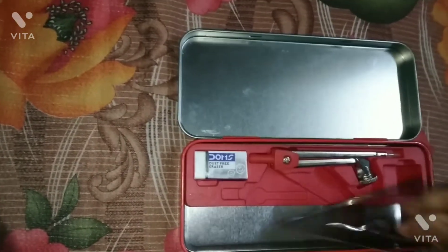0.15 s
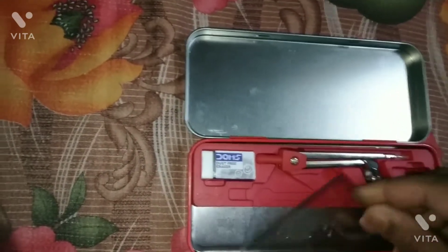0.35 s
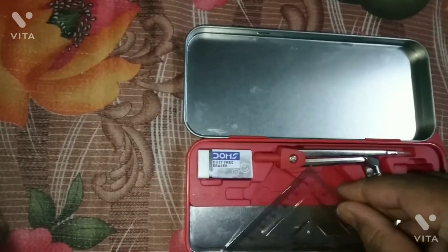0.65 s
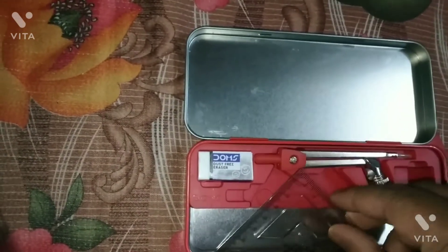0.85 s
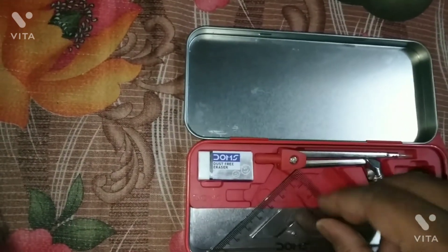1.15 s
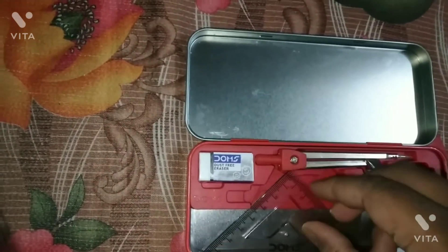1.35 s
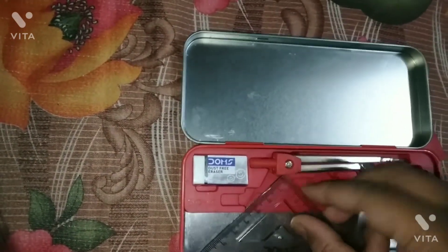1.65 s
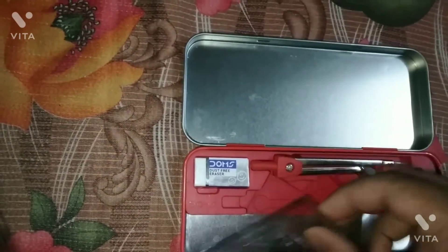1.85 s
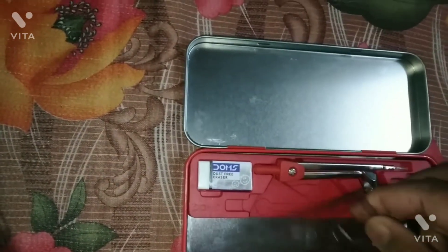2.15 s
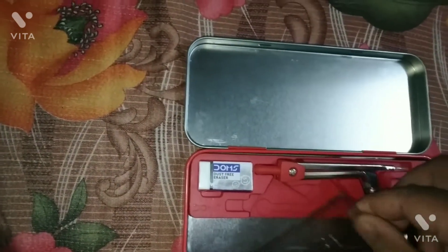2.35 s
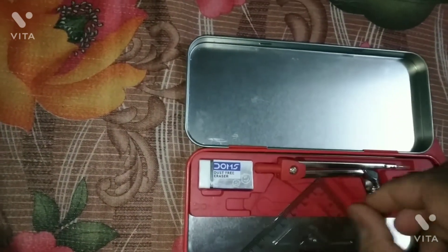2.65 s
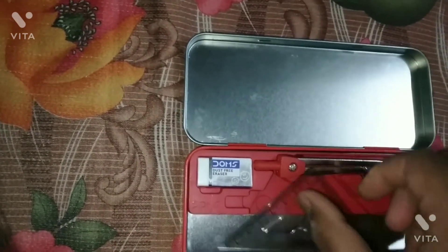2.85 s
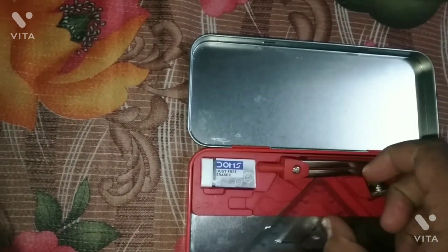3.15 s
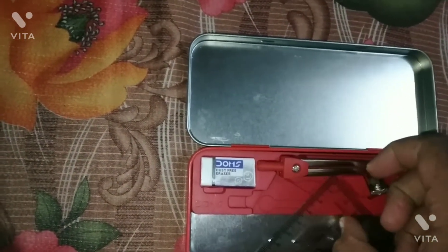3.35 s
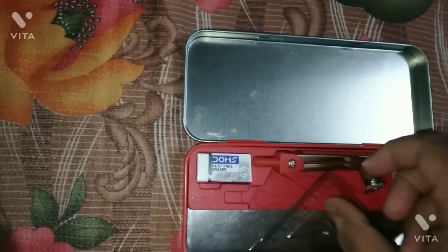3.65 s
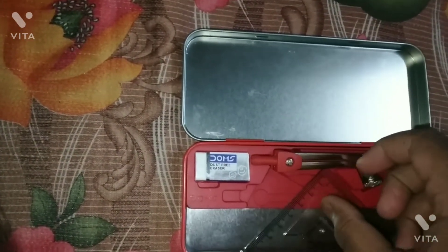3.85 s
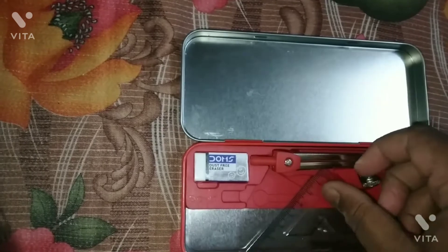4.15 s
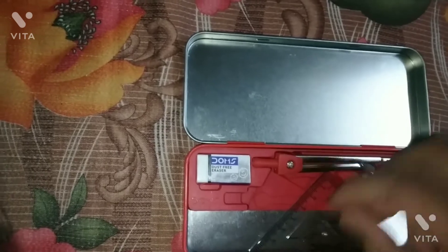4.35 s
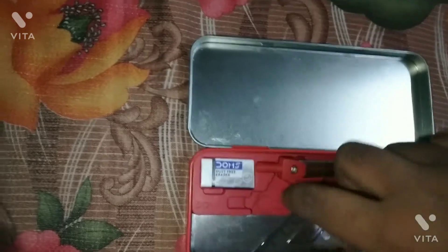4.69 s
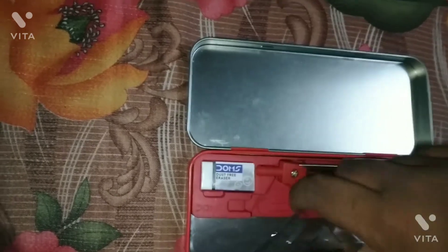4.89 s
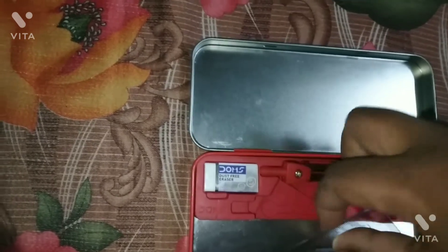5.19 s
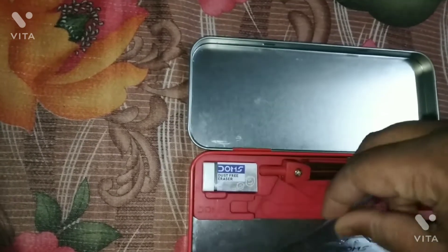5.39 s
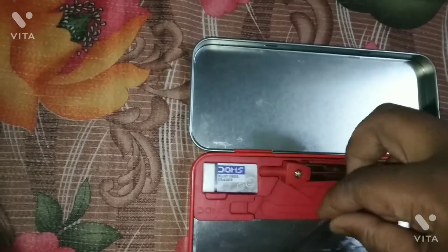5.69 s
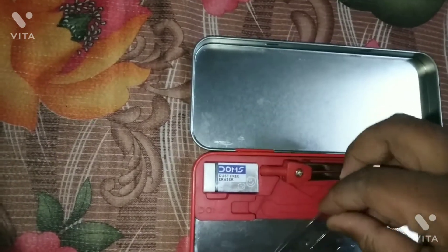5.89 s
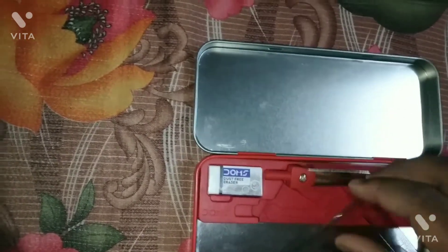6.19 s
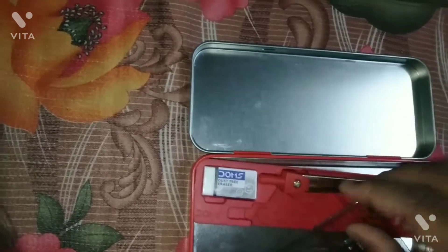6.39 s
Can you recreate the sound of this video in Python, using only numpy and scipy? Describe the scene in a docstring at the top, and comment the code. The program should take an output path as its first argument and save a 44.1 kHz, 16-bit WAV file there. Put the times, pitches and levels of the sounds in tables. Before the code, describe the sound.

A hand fits a plastic set square and a steel compass into the plastic tray of an open tin case, close to a phone microphone. The pieces tap, bounce, rub and drag in irregular bursts, with a very brief ring from the tray and tin and an occasional rattle. Behind them a small room carries a low motor hum, rumble and hiss. A soft drone swells midway, then a faint whine enters.

```python
"""A small room with a low motor hum, rumble and hiss. From 0.3 s a hand fits a plastic set square and a
steel compass into the plastic tray of an open tin case, close to a phone. The pieces rub, tap, bounce
and drag; tray and tin ring briefly. From 1.8 s a loose piece rattles now and then. A low drone swells
near 3 s; a faint whine enters near 4 s. Throughout, the phone's noise gate cuts treble in the pauses."""
import sys
import numpy as np
from scipy import signal
from scipy.fft import rfft, irfft, next_fast_len
from scipy.io import wavfile
from scipy.ndimage import uniform_filter1d, map_coordinates

SR = 44100
rng = np.random.default_rng(int(sys.argv[2]) if len(sys.argv) > 2 else 0)


def digitize_waveform(pressure):
    """Quantize a signal to 16-bit integers and store it at the path in sys.argv[1].

    Rows of a 2-D input are taken as channels; values are limited to [-1, 1].
    """
    field = np.atleast_2d(pressure).T
    bounded = np.clip(field, -1, 1)
    quanta = np.round(bounded * 32767).astype(np.int16)
    wavfile.write(sys.argv[1], SR, quanta)


N = 287973

# spectrum of a contact on the tray: f/Hz, density/dB
TRAY_SPECTRUM = [(130, -13.5), (195, 9.5), (280, 3), (420, -4), (560, -6), (800, -5), (1200, -7.5),
                 (1600, -0.5), (2800, 8.5), (4800, -0.5), (6600, 7), (7500, 5.5), (8500, -6.5),
                 (15800, -21.5)]
# stereo width: f/Hz, side minus mid/dB
STEREO_WIDTH = [(25, -6), (70, -14), (400, -13), (800, -7), (1500, -3), (4500, -1.5), (7000, -4.5),
                (11000, -7), (16000, -6)]


def amp(db):
    return 10 ** (np.asarray(db) / 20)


def unit(x):
    return x / np.sqrt(np.mean(x ** 2) + 1e-20)


def along(points, hz):
    """Interpolate (f/Hz, value) points on a log axis."""
    f, v = np.transpose(points)
    return np.interp(np.log(hz + 1), np.log(f + 1), v)


def curve(points):
    """Interpolate (t/s, value) points per sample."""
    return np.interp(np.arange(N) / SR, *np.transpose(points))


def wobble(rate_hz):
    """Smooth random curve through knots at rate_hz."""
    knots = rng.standard_normal(int(N * rate_hz / SR) + 4)
    return map_coordinates(knots, [np.arange(N) * rate_hz / SR])


def filtered(x, response):
    m = next_fast_len(N + 8192)
    return irfft(rfft(x, m) * response(np.fft.rfftfreq(m, 1 / SR)), m)[..., :N]


def stereo(pair, colour=lambda hz: 1):
    """Mid and side to left and right, nearly mono in the low mids."""
    mid, side = filtered(pair, lambda hz: colour(hz) * amp(along(STEREO_WIDTH, hz) * [[0], [1]]))
    return np.array([mid + side, mid - side])


def noise(colour, source=None):
    """Stereo noise of rms 1, shaped by the gain colour(hz)."""
    return unit(stereo(rng.standard_normal((2, N)) if source is None else source, colour))


def shifting_noise(depth_db):
    """Two noises whose resonant peaks shift as fingers and edges move."""
    spectra = signal.stft(rng.standard_normal((2, N)), nperseg=256)[2]
    peaks = uniform_filter1d(rng.standard_normal(spectra.shape[1:]), size=3, axis=0)
    peaks = uniform_filter1d(peaks, size=24, axis=1)
    return signal.istft(spectra * amp(depth_db * unit(peaks)), nperseg=256)[1][:, :N]


def add(track, at_s, sound):
    part = track[:, max(round(at_s * SR), 0):][:, :sound.shape[1]]
    part += sound[:, :part.shape[1]]


def motor_hum(hum_hz=96, waver_db=3, octave_db=-11):
    """A motor's fundamental and octave, wavering in pitch and level."""
    # hum envelope: t/s, level/dB
    levels = [(0, -53), (2.6, -53), (3.9, -61), (5.05, -52), (5.5, -59), (5.68, -45.5), (5.86, -53),
              (6.53, -53.5)]
    phase = 2 * np.pi * np.cumsum(hum_hz * (1 + .05 * wobble(16))) / SR
    tone = unit(np.sin(phase) + amp(octave_db) * np.sin(2 * phase))
    return amp(curve(levels) + waver_db * wobble(22)) * tone


def room_noise(rumble_db=-53, hiss_db=-78):
    """Steady room rumble and hiss."""
    # rumble spectrum: f/Hz, density/dB
    rumble_spectrum = [(12, -39.5), (20, -12), (38, -9), (54, -7.5), (102, -10.5), (149, -7.5), (169, -35),
                       (195, -17), (221, -24), (715, -36.5), (769, -41), (1030, -43.5), (1500, -80.5),
                       (1950, -101), (3300, -120)]
    # hiss spectrum: f/Hz, density/dB
    hiss_spectrum = [(300, -8.5), (1200, 0.5), (3000, 4), (7000, -0.5), (9500, -4.5), (16000, -19)]
    rumble = amp(rumble_db) * noise(lambda hz: amp(along(rumble_spectrum, hz)))
    hiss = amp(hiss_db) * noise(lambda hz: amp(along(hiss_spectrum, hz)))
    return rumble + hiss


def drone(centre_hz=295, half_width_hz=45, gain_db=1):
    """A soft, low band of noise that swells and sinks."""
    # drone envelope: t/s, relative level/dB
    levels = [(0.0, -74.5), (2.78, -69), (3.05, -55), (3.84, -63), (5.09, -59), (5.31, -74), (6.53, -61.5)]
    band = noise(lambda hz: 1 / (1 + ((hz - centre_hz) / half_width_hz) ** 2))
    return amp(curve(levels) + gain_db) * band


def rubs(fall_over_rise=1.5):
    """Short strokes of an edge: gains of the scrape and of the tray's rumble."""
    # strokes: peak t/s, level/dB, width/s, relative tray rumble/dB
    strokes = [(0.299, -61.5, 0.12, -23), (0.553, -62, 0.012, -1), (.69, -58, 0.014, -16),
               (0.812, -48.5, 0.013, 6.5), (0.947, -47, 0.032, -6.5), (1.288, -46, .017, 4.5),
               (1.493, -58, 0.018, 3.5), (1.69, -50.5, 0.039, 2), (1.783, -31.5, 0.016, 1.5),
               (1.923, -36.5, 0.026, -12.5), (2.074, -55, 0.015, 9), (2.214, -44, 0.027, -32),
               (2.336, -34, 0.0053, -22), (2.452, -44, 0.011, -27), (2.533, -36, 0.013, -4.5),
               (2.861, -46, 0.032, -7), (2.979, -38, 0.018, -21), (3.191, -44.5, 0.0094, -14),
               (3.462, -47.5, 0.0096, -3.5), (3.737, -38.5, 0.016, -1), (3.829, -43, 0.0086, -18.5),
               (4.114, -40, 0.017, 5), (4.531, -29.5, 0.0079, -1.5), (4.743, -43, 0.012, 0),
               (5.017, -41.5, 0.03, 3.5), (5.563, -44.5, 0.018, -24), (5.787, -42.5, 0.017, -23),
               (6.187, -41.5, 0.014, -10.5), (6.257, -35.5, 0.016, -35), (6.518, -46, 0.027, -16)]
    gains, t = np.zeros((2, N)), np.arange(-SR // 5, SR // 5) / SR
    for at_s, db, width_s, rumble_db in strokes:
        slope_s = width_s * fall_over_rise ** (np.sign(t) / 2)
        stroke = amp(db) * np.exp(-np.abs(t / slope_s) ** 1.25)
        add(gains, at_s + t[0], np.array([stroke, amp(rumble_db) * stroke]))
    return gains


def sliding(drag_db=-2, rub_db=-1, slip_hz=500, slip_db=2.3):
    """Plastic edges stick and slip over the tray; the short rubs also shake it."""
    # scrape spectrum: f/Hz, density/dB
    spectrum = [(290, -38.5), (500, -14.5), (893, -14.5), (1230, -16), (1570, -5.5), (1980, -9.5),
                (2770, -3), (4940, -9.5), (7100, -7), (8960, -19.5), (16000, -31.5)]
    rub, shake = rubs()
    grain = unit(amp(slip_db * wobble(slip_hz) + slip_db / 2 * wobble(slip_hz / 5)))
    source = shifting_noise(depth_db=4)
    force = np.hypot(amp(drag_db + 1.1 * wobble(16)) * drag(), amp(rub_db) * rub)
    scrape = force * noise(lambda hz: amp(along(spectrum, hz)), source)
    rumble = shake * noise(lambda hz: amp(along(TRAY_SPECTRUM, hz)) * (hz > 100) / (1 + (hz / 1500) ** 4))
    return grain * (scrape + rumble)


def taps(graze_s=.0044, graze_loss_db=22.5, rebound_s=.014, rebound_loss_db=21):
    """Contact rows of a piece set down: a light graze, the blow, a weaker rebound."""
    # blows: t/s, level/dB, dullness (knock over click)/dB, piece f/Hz, burst t60/s
    blows = [(0.349, -24, -6.5, 3020, 0.029), (0.366, -30.5, -11, 3840, 0.04),
             (0.3839, -31, -4.5, 1700, 0.049), (0.4292, -57, 21, 2590, 0.03),
             (0.9635, -12.5, -20, 3260, 0.032), (1.29, -36.5, 5.5, 1565, 0.039),
             (1.6223, -41, 1, 1463, 0.038), (1.746, -35, 9.5, 1390, 0.02), (1.7665, -28, 7, 1930, .03),
             (1.7707, -23.5, 8.5, 1290, 0.017), (1.7915, -8.5, -4, 2250, 0.0066),
             (1.9106, -36, -1.5, 3160, 0.048), (1.9421, -33, 5.5, 1460, 0.0089),
             (2.0046, -51, 13, 3330, 0.025), (2.2186, -26.5, -8, 2664, 0.069),
             (2.3464, -5, -23, 2910, .012), (2.3498, -10.5, -22.5, 7130, 0.01),
             (2.4917, -11, -17, 3520, 0.017), (2.7845, -66.5, 28, 1820, 0.026),
             (2.818, -48.5, 4, 3480, 0.099), (2.95, -24, -3, 2300, 0.016),
             (2.9854, -29.5, -18, 2460, 0.013), (3.0508, -8.5, -10, 2373, 0.015),
             (3.292, -31.5, 5.5, 1360, 0.017), (3.315, -22, -11.5, 3340, 0.041),
             (3.4442, -40.5, 4, 3380, 0.022), (3.7163, -27, 2.5, 2860, .01),
             (3.8129, -28, -10, 2400, 0.041), (4.104, -20, -7, 1460, 0.0047),
             (4.2495, -20, -18, 4020, 0.065), (4.4486, -44.5, 14, 1530, 0.03),
             (4.458, -31.5, -5.5, 3800, 0.029), (4.5049, -21.5, -1, 1460, .021),
             (4.5231, -36, 1, 2370, 0.032), (4.6559, -27, -10, 2760, 0.081), (4.7211, -35, -7, 3100, 0.047),
             (4.775, -43, 20, 1700, 0.0067), (4.9313, -47.5, 5, 3170, 0.065),
             (5.0001, -25.5, 6.5, 1664, 0.0033), (5.024, -32.5, 1.5, 1730, .01),
             (5.0854, -37, 11, 1720, 0.0057), (5.1078, -18.5, -4.5, 3540, 0.029),
             (5.2334, -28, -3.5, 3170, 0.059), (5.2595, -30.5, -3, 2640, .045),
             (5.5168, -38, -3, 3700, 0.059), (5.5633, -48.5, 15, 2230, 0.027),
             (5.665, -45, -6, 3100, 0.049), (5.7067, -51.5, 19, 3450, 0.018), (5.908, -59, 8, 2720, 0.032),
             (6.209, -44.5, 16, 2720, 0.021), (6.2357, -28, -10, 2520, 0.069),
             (6.2992, -37, 8, 2510, 0.017), (6.5244, -31.5, -12, 3600, 0.051)]
    flights_s = rebound_s * rng.uniform(.75, 1.25, len(blows))
    rows = []
    for (at_s, db, *timbre), flight_s in zip(blows, flights_s):
        rows += [(at_s - graze_s, db - graze_loss_db, *timbre),
                 (at_s, db, *timbre),
                 (at_s + flight_s, db - rebound_loss_db, *timbre)]
    return rows


def drag(attack_s=.036, release_s=.04):
    """How hard the pieces are dragged, as a gain per sample."""
    # drags over the tray: start t/s, end t/s, level/dB
    spans = [(0.376, 0.472, -61), (1.64, 1.8, -59.5), (1.81, 1.934, -46.5), (2.23, 2.52, -56.5),
             (2.97, 3.32, -54.5), (4.22, 4.923, -61.5), (4.976, 5.237, -57.5), (5.296, 5.773, -61.5),
             (6.125, 6.343, -58)]
    t = np.arange(N) / SR
    gains = [amp(db) * np.exp(np.minimum(t - start_s, 0) / attack_s - np.maximum(t - end_s, 0) / release_s)
             for start_s, end_s, db in spans]
    return np.max(gains, axis=0)


def ticks(rate_hz=12, over_drag_db=6.5, dull_db=4, piece_hz=2650, t60_s=.031, count=160):
    """Contact rows of a dragged edge catching at random, following the force of the drag."""
    scatter = rng.standard_normal((count, 3))
    times_s = np.cumsum(rng.uniform(0, 2, count)) / rate_hz
    level_db = 20 * np.log10(drag() + 1e-9) + over_drag_db
    return [(at_s, level_db[int(at_s * SR)] + 2 * force, dull_db + 4 * dull,
             piece_hz * 2 ** np.tanh(pitch / 2), t60_s)
            for at_s, (force, dull, pitch) in zip(times_s, scatter) if at_s < N / SR]


def rattles(gap_s=.006, t60_s=.02, fade_db=2.5, count=16):
    """Contact rows of a loose piece striking at uneven gaps, losing force."""
    # chatter on the tray: t/s, length/s, level/dB, dullness/dB, piece f/Hz
    chatter = [(1.7995, 0.011, -33.5, 8, 1450), (2.3343, .014, -27.5, -6.5, 3180),
               (2.495, 0.02, -22.5, -28.5, 7350), (2.53, .026, -20.5, -26, 7430),
               (3.8268, .008, -28, -13.5, 3610), (4.254, 0.0345, -23, -13.5, 7020)]
    rows = []
    for at_s, length_s, db, dull_db, piece_hz in chatter:
        gaps_s = gap_s * (.5 + rng.random(count))
        levels_db = db + rng.normal(0, 3.7, count)
        rows += [(at_s + lag_s, hit_db - fade_db * lag_s / length_s, dull_db, piece_hz, t60_s)
                 for lag_s, hit_db in zip(np.cumsum(gaps_s) - gaps_s[0], levels_db) if lag_s < length_s]
    return rows


def tray_burst(t, band_noise, strength, t60_s, crack_db=-3, crack_t60_s=.0017):
    """A crack and a burst of dense, damped plastic resonances."""
    decay = amp(-60 * t / max(t60_s, .003)) + amp(crack_db - 60 * t / crack_t60_s)
    start = rng.integers(N - len(t))
    bands = band_noise[:, :, start:start + len(t)] * decay
    # the blow sets each band's energy, whichever stretch of noise is drawn
    trim = np.sqrt(np.mean(decay ** 2) / np.mean(bands ** 2, axis=(1, 2)))
    return np.tensordot(strength * trim, bands, axes=1)


def tin_ring(t, strength_at, ring_db=-17):
    """Modes of tin and steel; tray and cloth damp the high ones most."""
    # modes of the tin and the steel pieces: f/Hz, level/dB
    modes = [(190, -1.5), (400, -9.5), (690, -10.5), (850, -10), (1320, -12), (1510, -9.5), (1850, -12),
             (2490, -12.5), (2810, -7), (3200, -2), (3880, -11.5), (6100, -19.5), (6600, -8), (6930, 3),
             (7300, 2.5), (8760, -7.5)]
    mode_hz, mode_db = np.transpose(modes)
    t60_s = .075 * (1000 / mode_hz[:, None]) ** .25
    weights = amp(mode_db + ring_db + rng.normal(0, 3, len(modes)))  # each spot favours other modes
    held_hz = mode_hz * rng.normal(1, .007, len(modes))  # fingers detune them
    phase = 2 * np.pi * (held_hz[:, None] * t + rng.random((len(modes), 1)))
    return (strength_at(mode_hz) * weights) @ (amp(-60 * t / t60_s) * np.sin(phase))


def contacts(piece_db=-7, piece_t60_s=.028, attack_s=.0008, rattle_fizz_db=4):
    """Each tap, tick and rattle excites the tray, one bending mode of the piece and the tin."""
    # click, knock, clack and fizz bands: low f/Hz, high f/Hz
    bands = [(4500, 9000), (100, 1200), (1200, 4500), (9000, 17000)]
    band_db = np.array([-3, -3, 2.13, -15.5])
    db_per_dull_db = np.array([0, 1, .51, -.08])  # duller: more knock and clack, less fizz
    low_hz, high_hz = np.transpose(bands)
    source = shifting_noise(depth_db=4.8)
    band_noise = np.array([noise(lambda hz: amp(along(TRAY_SPECTRUM, hz)) * (hz > lo) * (hz < hi), source)
                           for lo, hi in bands])
    events = [(*row, 0) for row in taps() + ticks()]
    events += [(*row, rattle_fizz_db) for row in rattles()]  # light, fast contacts fizz more
    out, t = np.zeros((2, N)), np.arange(SR // 8) / SR
    for at_s, db, dull_db, piece_hz, t60_s, fizz_db in events:
        strength = amp(db + band_db + dull_db * db_per_dull_db + [0, 0, 0, fizz_db])
        strength_at = lambda hz: strength @ (np.less_equal.outer(low_hz, hz) & np.greater.outer(high_hz, hz))
        burst = tray_burst(t, band_noise, strength, t60_s)
        piece = amp(piece_db - 60 * t / piece_t60_s) * np.sin(2 * np.pi * piece_hz * t)
        hit = burst + strength_at(piece_hz) * piece + tin_ring(t, strength_at)
        add(out, at_s, hit * (1 - np.exp(-t / attack_s)))
    return out


def room(dry, delay_s=.004, patterns=33):
    """Diffuse wall reflections; their pattern changes as the hand moves."""
    # room decay: f/Hz, t60/s
    decay_times = [(200, 0.28), (550, 0.083), (1400, 0.22), (3700, 0.16), (10000, 0.2), (16000, 0.06)]
    wet, step = np.zeros((2, N)), N // patterns + 1
    for start in range(0, N, step):
        hz, t, spectra = signal.stft(rng.standard_normal((2, SR // 4)), SR, nperseg=256)
        tail = signal.istft(spectra * amp(-60 * t / along(decay_times, hz)[:, None]), SR, nperseg=256)[1]
        tail /= np.linalg.norm(tail[0])
        add(wet, start / SR + delay_s, signal.fftconvolve(dry[None, start:start + step], tail, axes=1))
    return wet


def whine(whine_hz=3160, waver_db=2.5):
    """A thin tone, unsteady in level and pitch."""
    # whine envelope: t/s, level/dB
    levels = [(4.0, -102), (4.14, -68.5), (5.2, -66.5), (5.8, -69.5), (5.97, -78), (6.53, -79.5)]
    gain = amp(curve(levels) + waver_db * wobble(29))
    phase = 2 * np.pi * np.cumsum(whine_hz * (1 + .0023 * wobble(68))) / SR
    return gain * np.sqrt(2) * np.sin(phase)


def scene(room_db=-9):
    """The case lies nearer the left microphone port, which also resonates in the treble."""
    # lead of the left port: f/Hz, phase/rad
    port_lead = [(100, 0), (750, .1), (1250, 1.1), (2000, 1.7), (2900, 2.6), (3900, 4.8), (5800, 6.28),
                 (16000, 6.28)]
    # port balance: f/Hz, left minus right/dB
    port_balance = [(1000, 0), (1300, 1.5), (2400, -1.5), (4500, -.5), (6000, 1.5), (7200, 10), (8000, 7),
                    (9200, 0), (15000, -.5)]
    ports = np.array([[.5], [-.5]])
    near = contacts() + sliding()
    direct = filtered(near, lambda hz: np.exp(1j * along(port_lead, hz) * ports))
    reverb = amp(room_db) * stereo(room(near.mean(axis=0)))
    case = filtered(direct + reverb, lambda hz: amp(along(port_balance, hz) * ports))
    return case + motor_hum() + room_noise() + drone() + whine()


def record(dry, gate_db=-65, depth_db=18, split_hz=900, slope=.89, top_hz=15900):
    """A noise gate lowers the treble when it falls under a threshold; a steep low-pass follows."""
    treble = filtered(dry, lambda hz: 1 - 1 / (1 + (hz / split_hz) ** 4))
    power = uniform_filter1d(np.mean(treble ** 2, axis=0), SR // 50)
    level_db = 10 * np.log10(np.abs(power) + 1e-14)
    gain = amp(np.clip(slope * (level_db - gate_db), -depth_db, 0))
    return filtered(dry + (gain - 1) * treble, lambda hz: 1 / (1 + (hz / top_hz) ** 90))


dry = scene()
out = record(dry)
digitize_waveform(out)
```